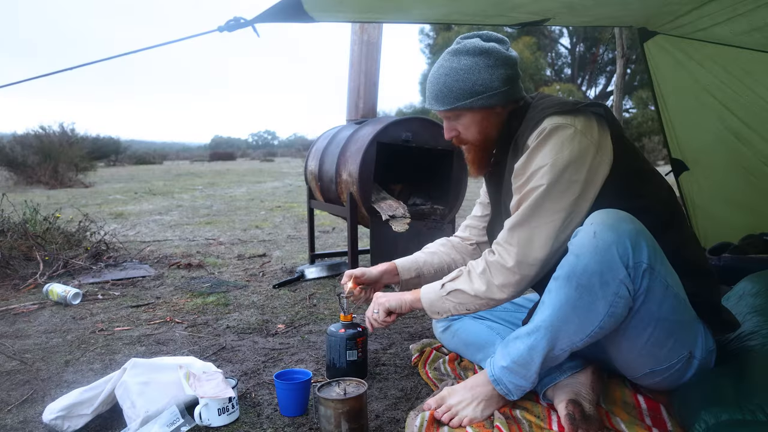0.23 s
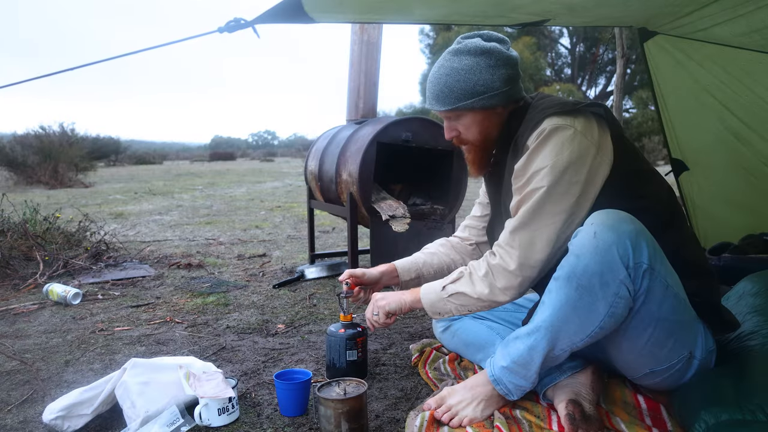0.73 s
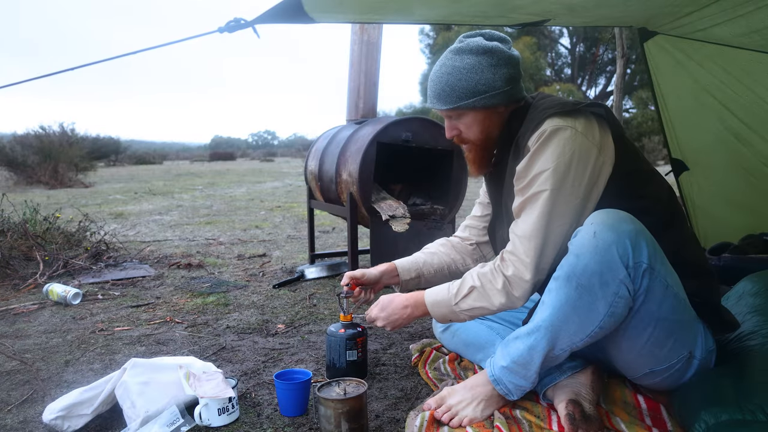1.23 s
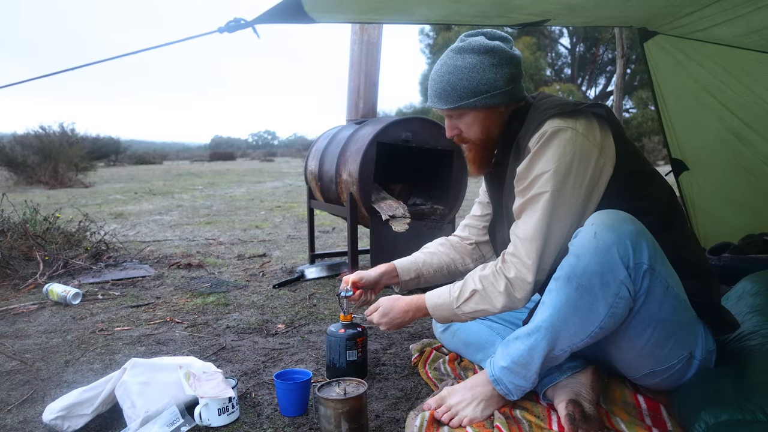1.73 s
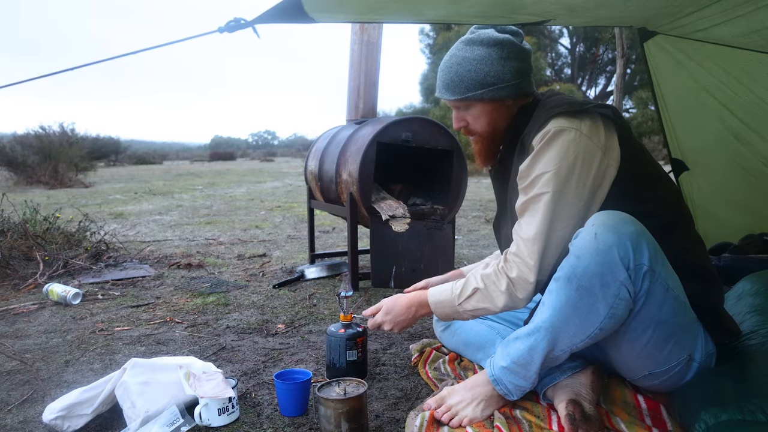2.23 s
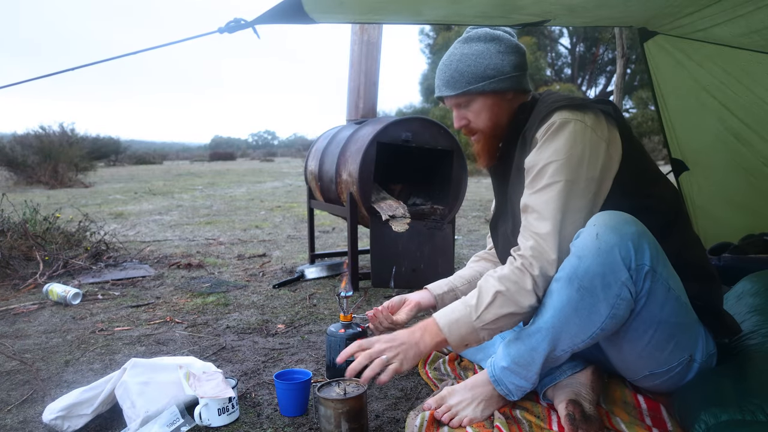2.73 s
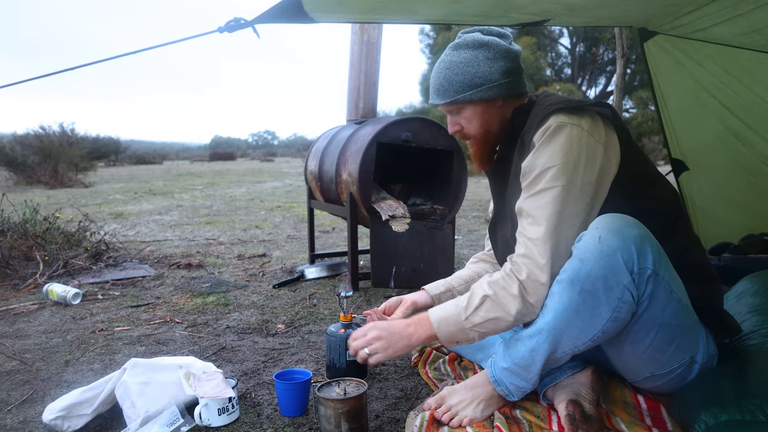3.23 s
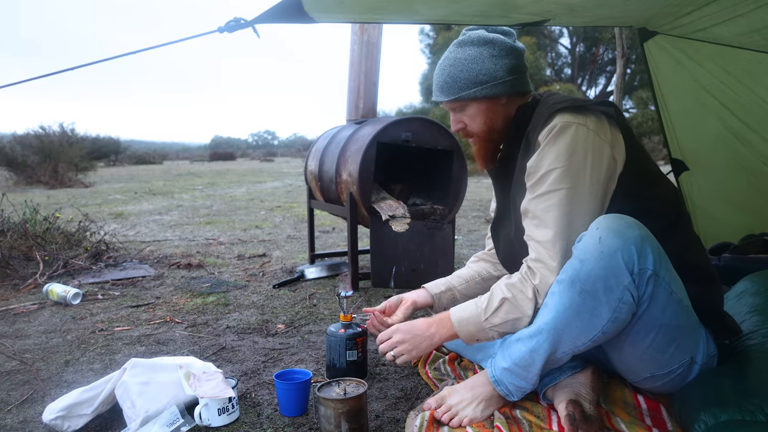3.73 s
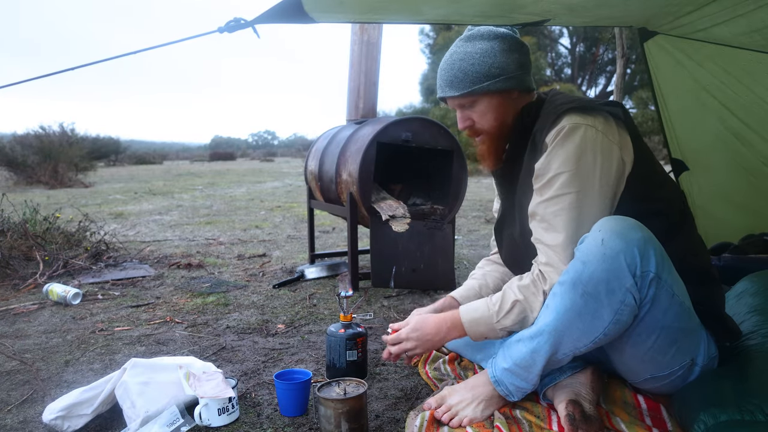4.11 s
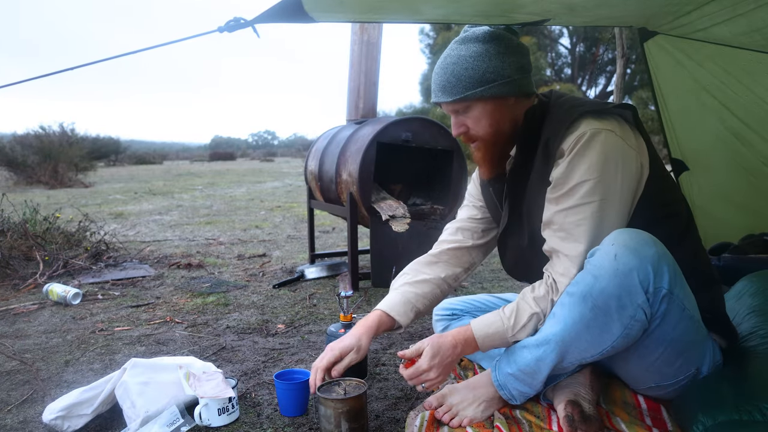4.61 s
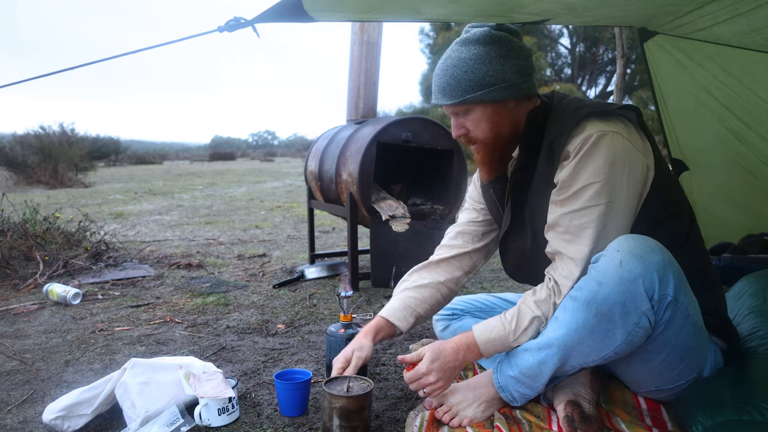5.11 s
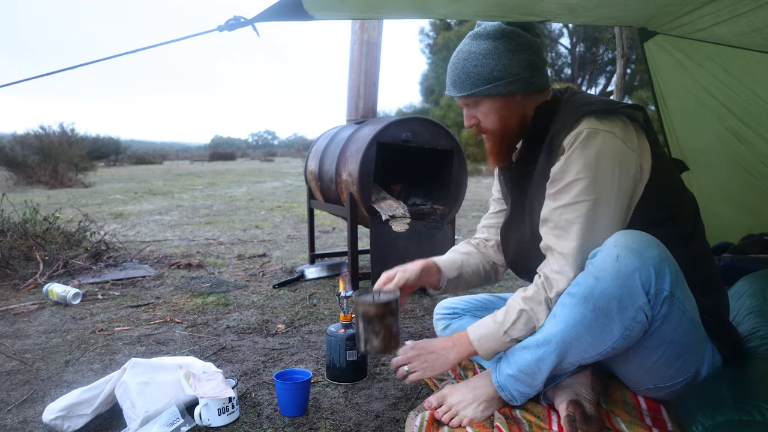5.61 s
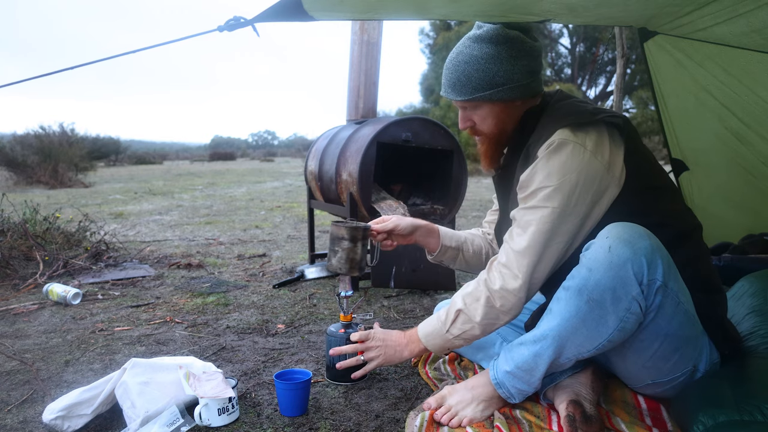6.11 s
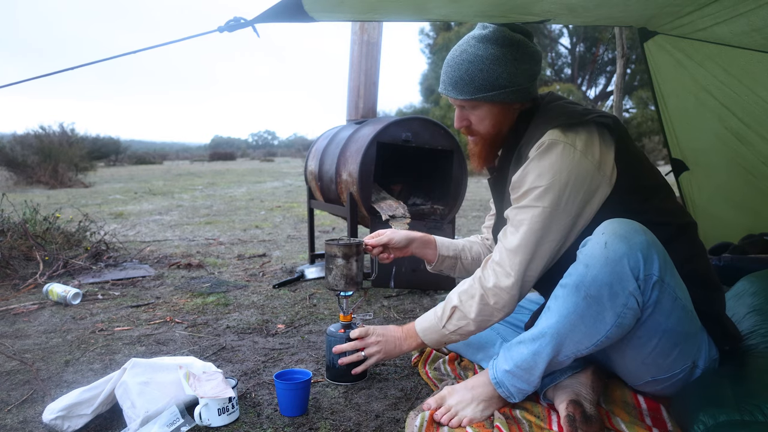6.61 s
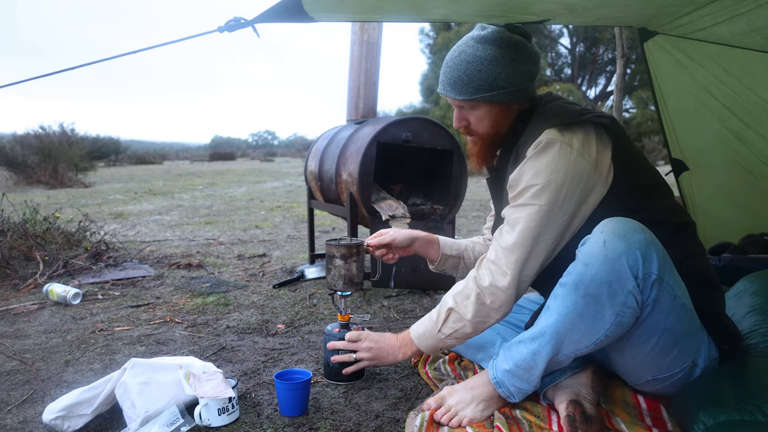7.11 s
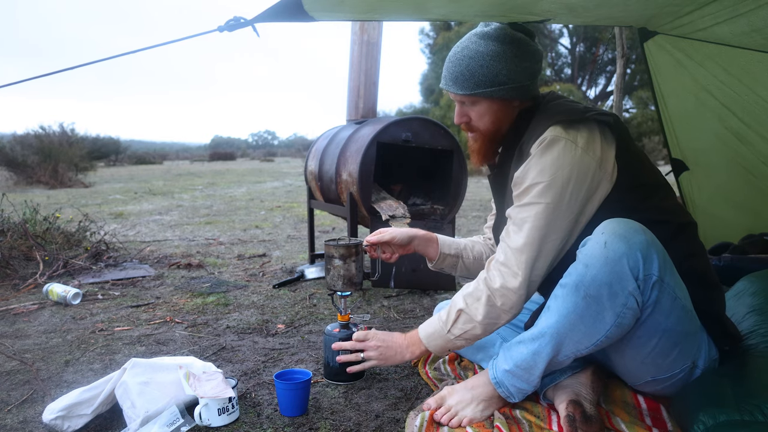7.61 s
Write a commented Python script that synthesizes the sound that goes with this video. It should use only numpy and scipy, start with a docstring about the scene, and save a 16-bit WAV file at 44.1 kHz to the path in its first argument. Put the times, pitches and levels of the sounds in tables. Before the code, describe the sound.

A flint lighter scrapes twice, a gas camp stove catches with a thump and roars, a metal pot knocks onto it, birds chirp, wind buffets

```python
"""A moment in a breezy open field (rustling noise, a deep throb), then a camp under a tarp with quiet air (soft noise).
A flint lighter is struck twice (scraped noise rings its body), gas hisses, and the stove catches with a low thump.
The flame roars and rushes (shaped noise) and is turned up; a metal pot knocks (ringing steel) and is set over it.
Late on, a breeze and gusts buffet the microphone (deep noise) and water slops in the pot (rough rising tones).
Small birds whistle all along (gliding near-sine notes). Nearly mono: only microphone hiss differs between the ears."""
import sys
import numpy as np
from scipy import signal
from scipy.fft import rfft, irfft, next_fast_len
from scipy.io import wavfile
from scipy.ndimage import uniform_filter1d

SR = 44100
rng = np.random.default_rng(int(sys.argv[2]) if len(sys.argv) > 2 else 0)


def int16_out(signal):
    """Quantize to a 16-bit WAV file."""
    q = np.round(np.clip(np.atleast_2d(signal).T, -1, 1) * 32767)
    wavfile.write(sys.argv[1], SR, q.astype(np.int16))


N = 346626
TIME = np.arange(N) / SR

# how far the gas valve is open: (time [s], opening [0-1])
VALVE = [(1.0, 0), (1.12, 0.52), (3.5, 0.43), (3.64, 1), (7.86, 1)]
# the gas catches with a thump
LIGHT_S, THUMP_DB, THUMP_HZ = 1.8195, -12, 103
# noise colours, all (frequency [Hz], relative level per hertz [dB])
# the flame's low roar, and what a wide-open valve adds to it
ROAR_COLOUR = [(25, -43), (50, -14), (100, -5.5), (180, -0.5), (260, -4), (380, -8), (490, -14.5),
               (600, -23), (690, -18.5), (850, -26.5), (2000, -49.5)]
FULL_ROAR_COLOUR = [(100, -8.5), (250, 2.5), (380, -1), (520, 0.5), (610, -8.5), (690, -4), (770, -4.5),
                    (870, -20), (1300, -45)]
# the rush of the burner head, and the hiss of the gas jet
RUSH_COLOUR = [(600, -19), (870, -6.5), (1020, 2), (1400, 3.5), (1750, -0.5), (2100, -11.5), (2400, -11),
               (2750, -7), (3350, -9.5), (4100, -16.5), (4700, -13), (5600, -18), (9000, -28.5),
               (15000, -44)]
JET_COLOUR = [(1500, -3), (2600, 2), (3400, 5), (4100, 2), (4650, 6), (5500, -9.5), (8000, -4.5),
              (9300, -1.5), (10500, -19), (15000, -29)]
# quiet outdoor air, the rustle of the field, wind on the microphone, and the microphone's own hiss
AIR_COLOUR = [(20, 4), (50, -7), (85, 4), (130, -2.5), (300, -5.5), (700, -7), (1200, -9), (2000, -11.5),
              (3200, -12.5), (5000, -11.5), (8000, -14.5), (11000, -15), (15500, -15)]
FIELD_COLOUR = [(100, -5), (250, -9), (480, 1), (800, -7), (1700, -5), (3000, -10), (5000, -11),
                (6000, -22), (15000, -32)]
BUFFET_COLOUR = [(12, -17), (24, 1), (32, -2), (42, -9), (80, -13), (160, -63), (400, -74)]
HISS_COLOUR = [(30, -5), (600, -5), (2000, -13), (4000, -8.5), (8000, -3.5), (15000, -11.5)]
# flame levels at full opening without the pot; each part's amplitude grows as opening ** power
ROAR_DB, ROAR_POWER = -38.5, 0.43
RUSH_DB, RUSH_POWER = -46, 1.61
# the pot is lowered over the burner: it deepens the roar and shades the rush
POT_FROM_S, POT_SEATED_S = 5.8, 6.96
POT_ROAR_DB, POT_RUSH_DB = 0.4, -4.5
# bands of the hiss that the pot's underside cancels: (centre [Hz], width [Hz], depth once seated [0-1])
POT_NOTCHES = [(2360, 150, 0.3), (4080, 410, 0.84)]
# thumb on the flint wheel: (spark time [s], spark level [dB], spark length [s],
# scrape level [dB], run-up [s])
STRIKES = [(0.3838, -33, 0.0029, -28.5, 0.0075), (1.4585, -8.5, 0.00066, -29.5, 0.0065)]
# resonances of the lighter's body: (centre [Hz], width [Hz], relative level [dB])
LIGHTER_BODY = [(3350, 260, 11), (4400, 990, -10), (5800, 1200, -2.5), (7400, 640, -13), (8970, 1350, -1),
                (11500, 1500, -11), (12800, 2200, -10)]
# the thumb lands on the lighter's lever with a dull thud
THUD_S, THUD_DB, THUD_HZ, THUD_DECAY_S = .396, -36, 132, 0.0026
# small metal knocks of lighter, valve, handle and pot: (time [s], level before the treble tint [dB],
# treble gain [dB], rattle decay [s], hollow body relative to steel [dB])
KNOCKS = [(.202, -53, -8, .0035, -20), (.214, -52, -16, 0.0025, -20), (0.233, -49.5, -21, .0045, -20),
          (.366, -34.5, -17, 0.0038, -25), (0.394, -35, -3, 0.00079, -12), (0.398, -39, -5, 0.0008, -18),
          (0.7364, -44, -21, 0.0034, -13), (1.473, -40, -13, .0009, -27), (1.5406, -45.5, -1, .0013, -16),
          (4.3898, -29, -40, 0.0018, -12), (4.7727, -31.5, -9, 0.0097, -5), (4.93, -29, -1.5, 0.0066, 1),
          (5.8877, -32, -7.5, 0.002, -14), (6.5027, -39, -26, .0017, -10), (6.6692, -41, 3, 0.0062, 6),
          (6.9323, -47.5, 4, 0.0061, 11), (6.981, -42, -7, 0.0085, 3), (6.995, -40.5, -7, 0.014, 6)]
# ringing of thin steel: (frequency [Hz], time to fall 60 dB [s], relative level [dB])
STEEL_MODES = [(2228, 0.085, 0), (2940, 0.04, -3.5), (3205, 0.019, 13.5), (4140, 0.031, 4.5),
               (4960, 0.036, 3.5), (6120, 0.04, -2.5), (6700, 0.0078, 8), (7540, 0.054, -3),
               (9160, 0.065, -1.5), (10900, 0.027, -28), (13200, .015, -36), (14800, 0.018, -13),
               (15500, .015, -14)]
# ringing of the hollow steel body: (frequency [Hz], time to fall 60 dB [s], relative level [dB])
BODY_MODES = [(415, 0.1, 2.5), (716, 0.04, -4.5), (1026, 0.055, -5.5)]
# water slops in the pot as it is seated: (time [s], length [s], centre [Hz], level before roughness [dB])
SLOPS = [(6.853, .05, 586, -41), (6.965, 0.044, 901, -43.5)]
SLOP_RISE_OCTAVES = 0.83
# near birds hold a note, slur down and level out: (time of the drop [s], lead [s], tail [s],
# centre [Hz], level before near_db [dB])
SLURS = [(3.488, 0.066, 0.063, 5070, -50), (3.906, 0.035, .075, 3580, -50.5),
         (4.255, 0.039, .06, 3420, -50.5), (5.818, 0.048, 0.057, 4940, -54),
         (6.485, .022, 0.048, 4220, -48.5), (7.245, 0.063, 0.035, 5110, -56),
         (7.82, 0.018, 0.058, 4280, -50)]
SLUR_OCTAVES, SLUR_DROP_S = .33, 0.0186
# plain notes that glide evenly: (time [s], length [s], centre [Hz], glide [octaves per s],
# level before near_db [dB])
NOTES = [(0.268, .08, 2450, 0, -64), (.667, .1, 4950, 1, -64), (1.03, 0.031, 5840, -21.5, -56.5),
         (1.935, 0.1, 3320, -1.5, -59.5), (2.055, 0.15, 2915, -1.6, -56), (2.316, .06, 2280, 1.5, -61),
         (2.395, 0.05, 2530, 3, -57), (2.431, 0.06, 3520, -3, -58), (3.07, 0.034, 3480, -10, -61),
         (3.193, 0.042, 3850, 3, -66), (3.31, 0.066, 3650, 4, -65), (3.54, 0.14, 3790, 2, -62),
         (4.868, .063, 5150, -1.6, -44), (5.23, 0.04, 2370, 3.9, -53), (5.305, .05, 2500, 3.5, -52),
         (5.37, 0.16, 3780, -.8, -58), (6.407, 0.057, 5140, -0.5, -54), (7.44, 0.044, 3080, 6, -54),
         (7.64, 0.18, 3600, 2.1, -58)]
# thin chips that arch up and down again: (time [s], length [s], top [Hz], level before near_db [dB])
CHIPS = [(0.755, .064, 6560, -67), (.975, 0.082, 7450, -65), (3.195, .07, 6530, -65)]
CHIP_ARCH_OCTAVES = 0.35
# bouts of far twitter: (start [s], end [s], centre [Hz], middle level [dB])
BOUTS = [(0.252, 0.598, 3200, -72), (1.9, 2.55, 3150, -62), (2.552, 3.4, 3600, -65), (3.6, 7.3, 3200, -65),
         (7.298, 7.861, 3000, -62.5)]
TWITTER_PER_S = 34
# a breeze rises on the microphone and then holds
BREEZE_FROM_S, BREEZE_FULL_S, BREEZE_START_DB, BREEZE_DB = 4.8, 6.4, -60, -44.5
# gusts on top of the breeze: (time [s], peak level [dB])
GUSTS = [(5.97, -41), (6.69, -29), (7.02, -33), (7.6, -55), (7.84, -45)]
GUST_RISE_S, GUST_FALL_S = 0.053, 0.1
# the open field gives way to the camp; until then the hand-held microphone throbs
FIELD_END_S, THROB_HZ, THROB_DB = .174, 25.7, -37
# the steep cut at the very top
TOP_HZ = 15850


def flame(full_db=-5, jet_db=-59, flutter_db=0.33, flicker_db=0.92, flow_power=0.11):
    """Turbulent burning roars low and the burner head rushes, shaken by the same eddies; the gas jet hisses."""
    valve = np.clip(curve(VALVE), 0, 1)
    lit = np.clip((TIME - LIGHT_S) / 0.052, 0, 1)
    pot = ramp(POT_FROM_S, POT_SEATED_S)
    eddies_db = flutter_db * walk(22.01)
    # a wide-open valve makes smaller, faster eddies: the roar reaches higher
    roar = noise(ROAR_COLOUR) + undb(full_db) * valve ** 2 * noise(FULL_ROAR_COLOUR)
    roar = roar * valve ** ROAR_POWER * undb(ROAR_DB + POT_ROAR_DB * pot + eddies_db)
    rush_db = RUSH_DB + POT_RUSH_DB * pot + .5 * eddies_db + flicker_db * walk(45)
    rush = noise(RUSH_COLOUR) * valve ** RUSH_POWER * undb(rush_db)
    # the jet hisses from the moment the valve opens, a little louder once lit
    jet = noise(JET_COLOUR) * undb(jet_db - 4.5 * (1 - lit)) * valve ** flow_power
    hiss = lit * rush + jet
    cancelled = sum(depth * band(hiss, hz, width_hz) for hz, width_hz, depth in POT_NOTCHES)
    return lit * roar + hiss - pot * cancelled


def ignition(swell_s=0.002, ring_s=0.0016, crackle_db=-35, billow_db=-33, billow_s=0.011):
    """The pooled gas flares in one pressure pulse that swings back and dies, inside a short billow and crackle."""
    t = TIME - LIGHT_S
    envelope = np.where(t < 0, np.exp(-(t / swell_s) ** 2), np.exp(-np.abs(t) / ring_s))
    pulse = envelope * np.cos(2 * np.pi * THUMP_HZ * t)
    billow = noise(ROAR_COLOUR) * np.exp(-np.abs(t - .004) / billow_s)
    crackle = noise([(300, 10), (1400, -1), (2200, -8), (3200, -6), (4200, -20), (15000, -38)])
    crackle = crackle * np.exp(-((t - .003) / 0.003) ** 2)
    return undb(THUMP_DB) * pulse + undb(billow_db) * billow + undb(crackle_db) * crackle


def lighter(stop_s=0.0068, grit_db=-18, bite_db=2.0, lowest_hz=1700, hum_db=-38, hum_swell_s=0.033):
    """Wheel teeth scrape the flint harder and harder until it sparks; the grit rings the lighter."""
    out = np.zeros(N)
    t = np.arange(-SR // 12, SR // 12) / SR  # 0 is the spark
    for s, spark_db, spark_s, scrape_db, run_up_s in STRIKES:
        grit, teeth = rng.standard_normal((2, len(t)))
        scrape = undb(scrape_db + bite_db * unit(low(teeth, 590)))
        scrape = scrape * np.exp(-np.abs(t) / np.where(t < 0, run_up_s, stop_s))
        force = scrape + undb(spark_db) * np.exp(-(t / spark_s) ** 2)
        push = force * grit
        ringing = sum(undb(db) * band(push, hz, width_hz) for hz, width_hz, db in LIGHTER_BODY)
        body = undb(grit_db) * push + ringing
        # so small a body radiates no bass
        add(out, s + t[0], unit(high(body, lowest_hz)) * np.sqrt(np.mean(force ** 2)))
        # a faint narrow hum at the lowest resonance swells into each spark, stronger around a louder one
        lowest = LIGHTER_BODY[0][0]
        hum = unit(band(band(teeth, lowest, 700), lowest, 700))
        swell = np.exp(-np.abs(t) / np.where(t < 0, hum_swell_s, stop_s))
        add(out, s + t[0], hum * undb(hum_db + .5 * spark_db) * swell)
    return out


def thud():
    """A soft push of the thumb: one low swing that dies at once."""
    t = np.maximum(TIME - THUD_S, 0)
    return undb(THUD_DB) * np.exp(-t / THUD_DECAY_S) * np.sin(2 * np.pi * THUD_HZ * t)


def knocks(crack_db=3, split_hz=6000, grain_db=3):
    """Each contact chatters unevenly for milliseconds and rings thin steel and, by a set share, a hollow body."""
    out = np.zeros(N)
    t = TIME[:SR // 6]
    for s, db, treble_db, rattle_s, body_db in KNOCKS:
        grit, bounce = rng.standard_normal((2, len(t)))
        force = np.exp(-t / rattle_s)
        chatter = force * grit * undb(grain_db * unit(low(bounce, 920)))
        hit = ring(chatter, STEEL_MODES) + undb(body_db) * ring(chatter, BODY_MODES)
        hit = hit + undb(crack_db) * unit(high(chatter, 1650))
        # the two filters turn the wave opposite ways where they meet, hence the minus
        tinted = low(hit, split_hz) - undb(treble_db) * high(hit, split_hz)
        add(out, s, tinted * undb(db) * np.sqrt(np.mean(force ** 2)))
    return out


def slops(rough_hz=130):
    """Each slop is a short, rough, hollow gurgle that climbs as its air pocket closes."""
    out = np.zeros(N)
    for s, length_s, hz, db in SLOPS:
        add(out, s, undb(db) * whistle(length_s, hz, lambda v: SLOP_RISE_OCTAVES / 2 * v))
    return out * unit(low(rng.standard_normal(N), rough_hz))


def birds(near_db=-1, scatter_db=-8, scatter_t60=0.4, bounce_db=-12, bounce_s=.017):
    """Near birds whistle over the twitter of far ones; the tarp returns one echo and trees scatter the rest."""
    near = np.zeros(N)
    for s, lead_s, tail_s, hz, db in SLURS:
        def slur(v):
            from_drop_s = np.interp(v, [-1, 1], [-lead_s, tail_s])
            return -SLUR_OCTAVES / 2 * np.tanh(from_drop_s / SLUR_DROP_S)
        add(near, s - lead_s, undb(db) * whistle(lead_s + tail_s, hz, slur))
    for s, length_s, hz, glide, db in NOTES:
        add(near, s, undb(db) * whistle(length_s, hz, lambda v: glide * length_s / 2 * v))
    for s, length_s, hz, db in CHIPS:
        add(near, s, undb(db) * whistle(length_s, hz, lambda v: -CHIP_ARCH_OCTAVES * v ** 2))
    song = undb(near_db) * near + twitter()
    out = song + undb(scatter_db) * scatter(song, scatter_t60)
    add(out, bounce_s, undb(bounce_db) * song)
    return out


def twitter(range_octaves=.6, shortest_s=0.0212, spread_s=0.0344, glide_octaves=.14, uneven_db=8):
    """Far birds trade short rising and falling notes, each bout around its own pitch."""
    out = np.zeros(N)
    for start_s, end_s, hz, db in BOUTS:
        count = round(TWITTER_PER_S * (end_s - start_s))
        for when, length, pitch, glide, size in rng.random((count, 5)):
            note = whistle(shortest_s + spread_s * length, hz * 2 ** (range_octaves * (pitch - .5)),
                           lambda v: glide_octaves * (2 * glide - 1) * v)
            add(out, start_s + when * (end_s - start_s), undb(db + uneven_db * (size - .5)) * note)
    return out


def wind():
    """A rising breeze buffets the microphone; each gust swells quickly and dies more slowly."""
    breeze_db = BREEZE_START_DB + (BREEZE_DB - BREEZE_START_DB) * ramp(BREEZE_FROM_S, BREEZE_FULL_S)
    force = undb(breeze_db) * (TIME > BREEZE_FROM_S)
    for s, db in GUSTS:
        force = force + undb(db) * np.exp(-np.abs(TIME - s) / np.where(TIME < s, GUST_RISE_S, GUST_FALL_S))
    return noise(BUFFET_COLOUR) * force


def outdoors(air_db=-56.5, field_db=-49, throb_waver=0.098):
    """Quiet air throughout; in the open field a louder rustle and a deep throb of the microphone."""
    in_field = TIME < FIELD_END_S
    # the rustle grows by 25 dB per second up to field_db
    rise_db = 25 * (np.minimum(TIME, FIELD_END_S) - FIELD_END_S)
    rustle = noise(FIELD_COLOUR) * undb(field_db + rise_db) * in_field
    throb = unit(np.sin(2 * np.pi * np.cumsum(THROB_HZ * (1 + throb_waver * walk(20))) / SR))
    throb = undb(THROB_DB) * throb * uniform_filter1d(in_field * 1., SR // 100)
    return noise(AIR_COLOUR) * undb(air_db + .5 * walk(3.0)) + rustle + throb


def whistle(length_s, hz, contour):
    """A wavering, throbbing near-sine; contour gives octaves from hz as the note runs from -1 to 1."""
    u = np.linspace(0, 1, int(length_s * SR))
    shake, throb = (unit(low(rng.standard_normal(SR // 4), 150))[:len(u)] for _ in range(2))
    pitch = hz * 2 ** contour(2 * u - 1) * (1 + .007 * shake)
    loudness = (u * (1 - u)) ** 0.63 * undb(2.4 * throb)
    return unit(loudness * np.sin(2 * np.pi * np.cumsum(pitch) / SR))


def ring(push, modes, spread=0.019, uneven_db=3):
    """Modes rung by a force; each contact point shifts their pitch and strength a little."""
    t = TIME[:len(push)]
    chance = rng.standard_normal((len(modes), 2))
    response = np.zeros(len(t))
    for (hz, t60, db), (shift, size) in zip(modes, chance):
        decay = undb(db + uneven_db * size - 60 * t / t60)
        response += decay * np.sin(2 * np.pi * hz * (1 + spread * shift) * t)
    return unit(signal.fftconvolve(push, response)[:len(t)])


def scatter(x, t60):
    """A diffuse outdoor echo of the same energy as the sound."""
    t = TIME[:SR // 2]
    tail = rng.standard_normal(len(t)) * undb(-60 * t / t60)
    return signal.fftconvolve(x, tail / np.linalg.norm(tail))[:N]


def noise(colour):
    """Noise of rms 1 with its spectrum shaped by a colour table."""
    size = next_fast_len(N, True)
    hz, db = np.transpose(colour)
    bins = np.maximum(np.fft.rfftfreq(size, 1 / SR), 1)
    gain = undb(np.interp(np.log(bins), np.log(hz), db))
    return unit(irfft(rfft(rng.standard_normal(size)) * gain, size)[:N])


def walk(rate):
    """A random wander of rms 1: levels held for 1 / rate seconds, then smoothed twice."""
    k = int(SR / rate)
    steps = np.repeat(rng.standard_normal(N // k + 1), k)
    return unit(uniform_filter1d(uniform_filter1d(steps, k), k)[:N])


def band(x, hz, width_hz):
    """One resonance, gain 1 at its centre."""
    return signal.lfilter(*signal.iirpeak(min(hz, .45 * SR), hz / width_hz, fs=SR), x)


def low(x, hz):
    """Gentle low-pass: keeps what lies below hz."""
    return signal.sosfilt(signal.butter(2, min(hz, .45 * SR), fs=SR, output="sos"), x)


def high(x, hz):
    """Gentle high-pass: keeps what lies above hz."""
    return signal.sosfilt(signal.butter(2, min(hz, .45 * SR), "high", fs=SR, output="sos"), x)


def curve(table, axis=1):
    """One column of a table, joined by straight lines in time."""
    rows = np.array(table)
    return np.interp(TIME, rows[:, 0], rows[:, axis])


def ramp(from_s, to_s):
    """Rises from 0 to 1 between two times."""
    return np.clip((TIME - from_s) / (to_s - from_s), 0, 1)


def add(track, s, sound):
    """Mix a sound in at a time."""
    start = max(int(s * SR), 0)
    part = sound[:N - start]
    track[start:start + len(part)] += part


def undb(db):
    """Decibels to gain."""
    return 10 ** (np.asarray(db) / 20)


def unit(x):
    """Scale to rms 1."""
    return x / np.sqrt(np.mean(x ** 2))


def scene(lighter_echo_db=-25, knock_echo_db=-12, echo_t60=0.2, hiss_db=-63.5):
    """All sources sit in the centre, with a short echo from tarp and ground; hiss is opposite in the two ears."""
    sparks, metal = lighter(), knocks()
    echo = scatter(undb(lighter_echo_db) * sparks + undb(knock_echo_db) * low(metal, 7000), echo_t60)
    stove = flame() + ignition()
    handling = sparks + thud() + metal + slops() + echo
    mid = stove + handling + birds() + wind() + outdoors()
    side = undb(hiss_db) * noise(HISS_COLOUR)
    return np.array([mid + side, mid - side])


def record(dry):
    """The recorder cuts the top steeply."""
    return signal.sosfilt(signal.ellip(10, .1, 80, TOP_HZ, fs=SR, output="sos"), dry)


dry = scene()
out = record(dry)
int16_out(out)
```